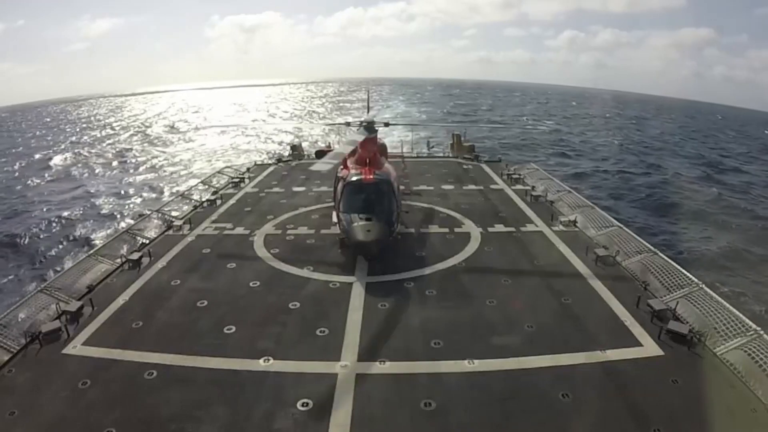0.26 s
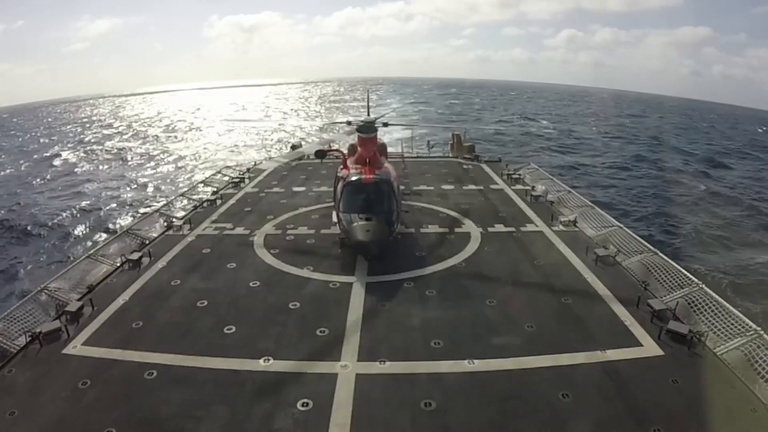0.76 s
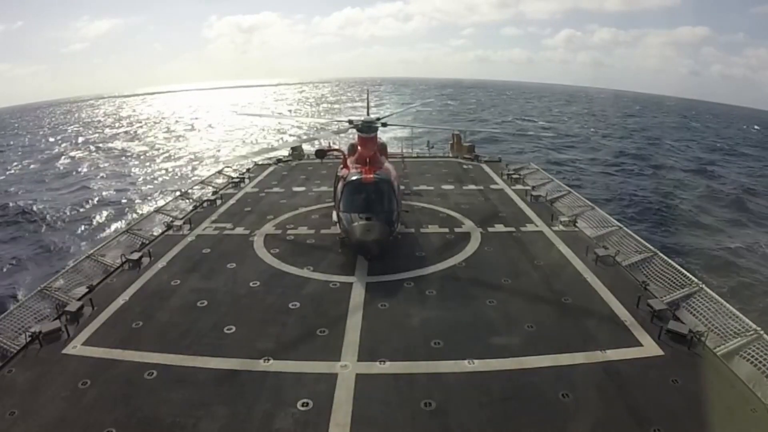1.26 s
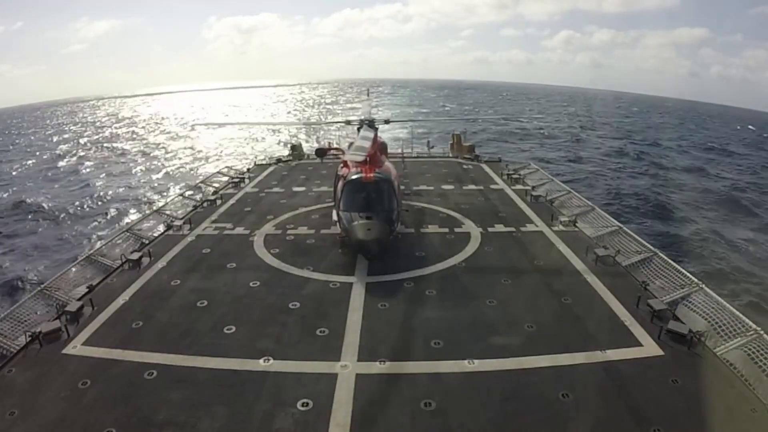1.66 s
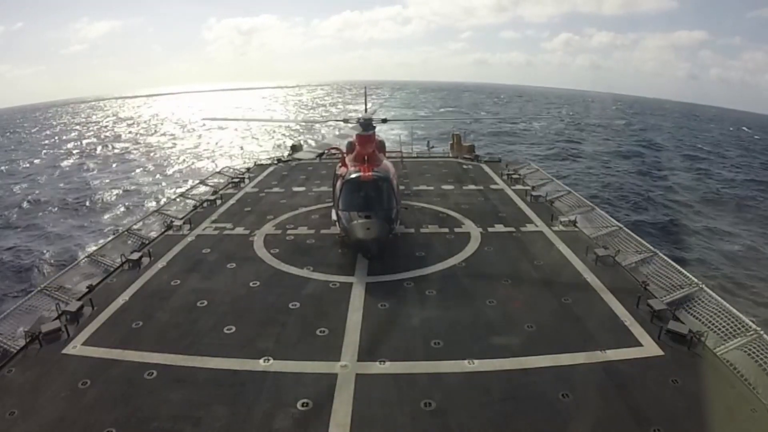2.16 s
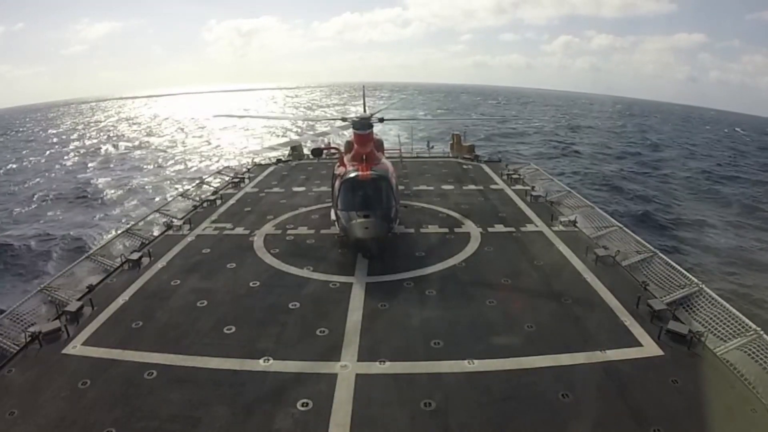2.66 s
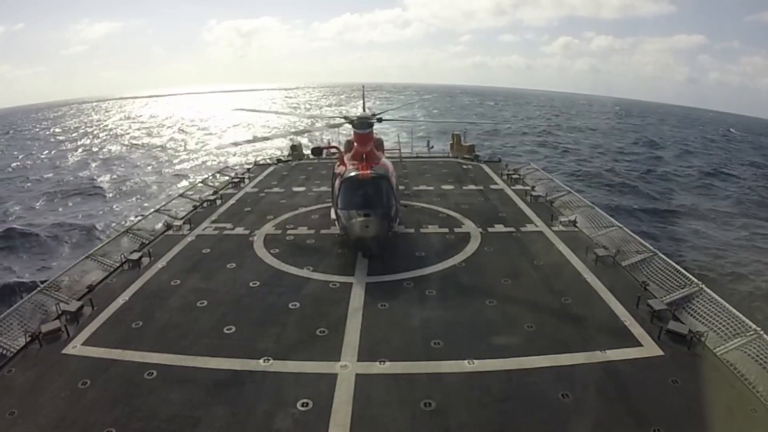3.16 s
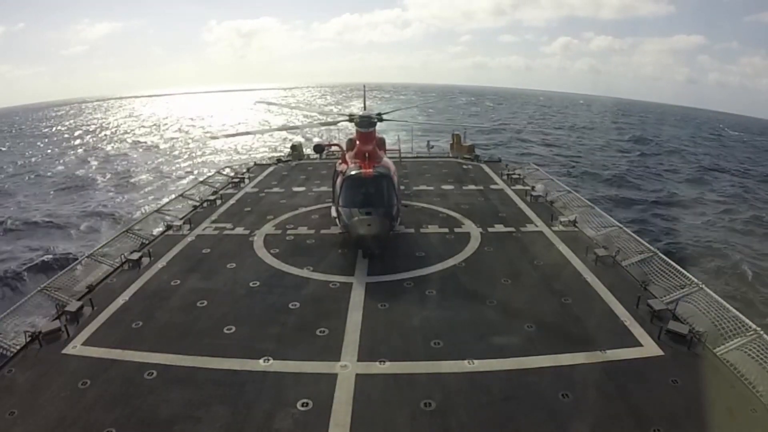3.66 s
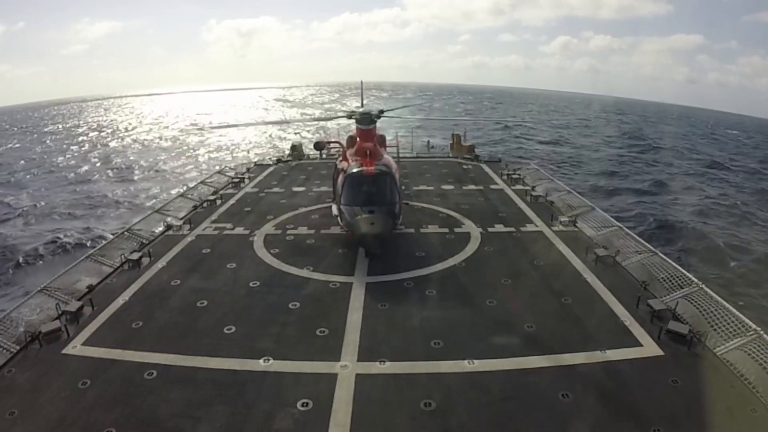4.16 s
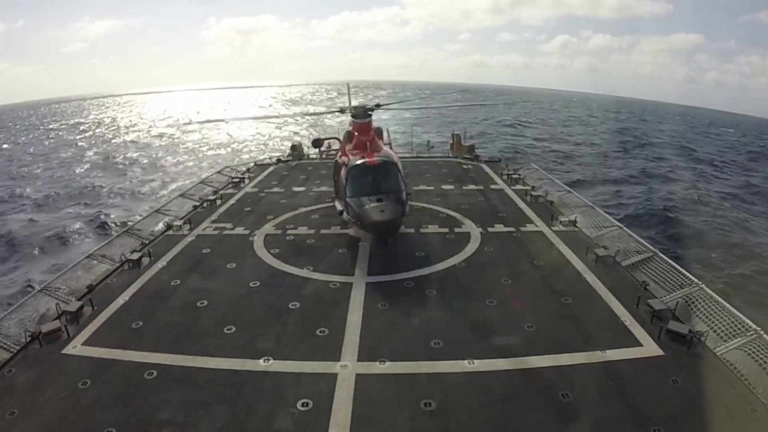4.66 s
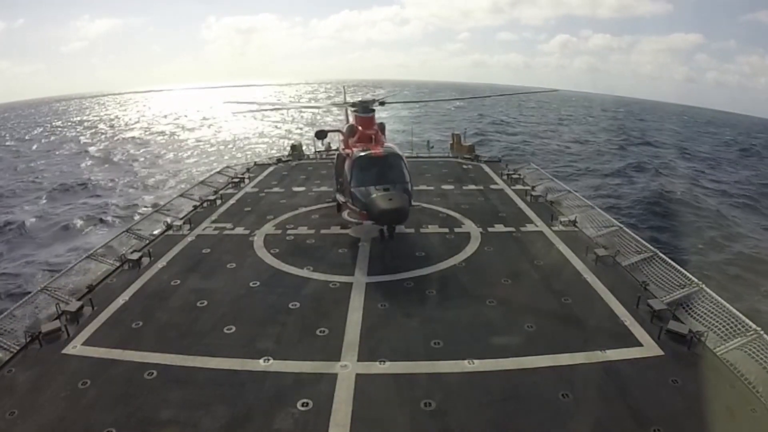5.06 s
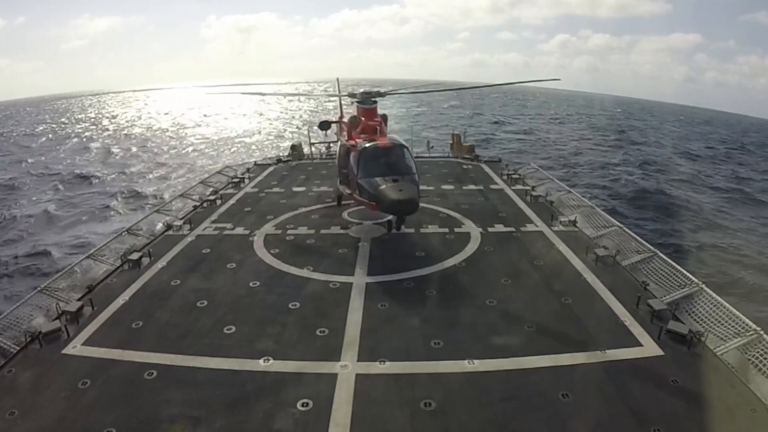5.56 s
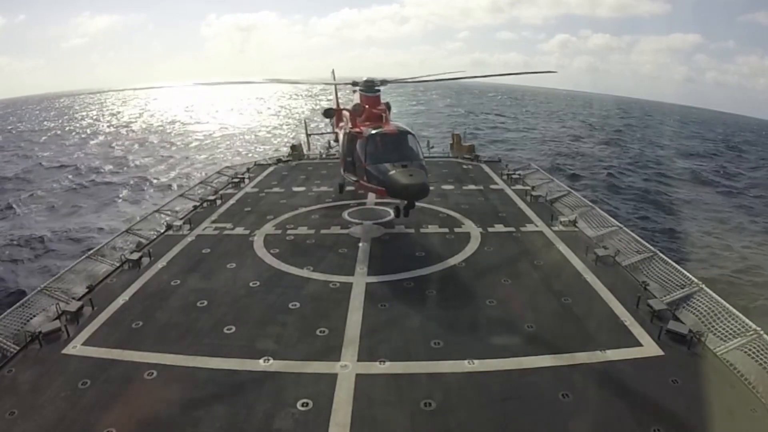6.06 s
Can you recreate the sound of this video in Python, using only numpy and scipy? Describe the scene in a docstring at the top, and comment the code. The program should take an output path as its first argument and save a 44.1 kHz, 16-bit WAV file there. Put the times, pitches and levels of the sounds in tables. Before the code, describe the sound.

Helicopter blades chop and boom on a ship's deck, growing louder through lift-off, with slaps, a thin rising whine and light spray.

```python
"""A helicopter runs on a ship's deck, heard from inside a closed housing. From the start its blades pass
about 24 times a second, giving low harmonics and a chopped wash over turbine hiss and the ship's rumble.
After a second the pilot pulls power: the rotor swells in gusts, blades slap, and the turbines wind up.
Wind rushes softly near 1.8 s; splats of spray follow, thickest near 4 s as downwash buffets the housing.
Around 4.7 s the wheels unload, and the thump and boom grow as the helicopter lifts off."""
import sys
import numpy as np
from scipy import signal
from scipy.fft import rfft, irfft, next_fast_len
from scipy.io import wavfile
from scipy.ndimage import map_coordinates

SR = 44100
rng = np.random.default_rng(int(sys.argv[2]) if len(sys.argv) > 2 else 0)


def master(y):
    """Save y as 16-bit WAV."""
    cut = np.clip(np.atleast_2d(y).T, -1, 1)
    pcm = np.round(cut * 32767)  # scale
    wavfile.write(sys.argv[1], SR, pcm.astype(np.int16))


N = 278271

# rotor speed: time_s, blade_pass_hz
BLADE_RATE = [(0, 24.25), (2, 24.27), (3.5, 24.23), (4.6, 24.17), (6.31, 24.2)]
# rotor thrust relative to the hover: time_s, thrust_db
THRUST = [(0, -11), (1.2, -9.5), (1.75, -3.5), (2.4, -4), (3.1, -2), (4.0, 0.5), (6.31, 1)]
# three groups of blade-pass harmonics: harmonic_number, relative_db
DRONE_ORDERS = [(2, -23), (3, -22.5), (4, -1), (5, -5.5)]
THROB_ORDERS = [(8, 0), (9, -7)]
BURR_ORDERS = [(10, 0), (11, 0.5), (12, -2.5), (13, -10), (14, -10.5)]
# gusts (+) and lulls (-): middle_s, length_s, boom_db, drone_and_hum_db, throb_db, air_and_burr_db
GUSTS = [(0.16, 0.33, 8.5, 4, 13.5, 1), (0.51, 0.68, 8, 5.5, 12.5, -2.5), (0.69, 0.19, -9, -6, -5, 1.5),
         (0.953, 0.64, 4.5, 4.5, 5, 0.5), (1.304, 0.12, 11.5, -0.5, -3.5, -0.5),
         (1.326, 0.53, 0.5, 6, 9, 2), (1.53, 0.52, 4.5, 0.5, -11.5, -2.0), (1.745, 0.1, -13, -2.5, 2, 0.5),
         (1.833, 0.75, 4.5, 2, 4, -1), (1.939, 0.12, -4.5, -9, 4.5, 2), (2.155, 0.33, 7.0, 0.5, -8, 0.5),
         (2.381, 0.15, 3, -8, 6.5, 4.5), (2.511, 0.093, -6, -1, 4.5, -0.5),
         (2.556, 0.58, 13.5, 1.0, 4, 3.5), (2.623, 0.082, 5.5, 5, 3.5, -3), (2.9, 0.21, 3, -5.5, 7.5, 1.5),
         (3.086, 0.097, -5, -1.5, -2, 0), (3.166, 0.13, 8.0, 3, -11, -1), (3.291, 0.19, 5, -4.5, 2.5, 1.5),
         (3.424, 0.19, 13.5, -1, 2, 3.5), (3.784, 0.23, 5, -2.5, -0.5, -5), (3.87, 0.17, -16, 0.5, 0, 1),
         (3.972, 0.16, 7.5, 1, 2, -0.5), (4.06, 0.2, -1, 5, -10, -2.0), (4.213, 0.57, 10.0, -2, 12.5, 8.5),
         (4.295, 0.38, 0.0, 6, -15, -8.5), (4.503, 0.18, 12.0, -2.5, 0, -2),
         (4.672, 0.19, -8.5, -2, 5.5, -1), (4.865, 0.21, -15, 4.0, -12.5, -1),
         (4.922, 0.6, 1.5, -7, -6, -2), (5.134, 0.1, -8.5, -7.5, 2, 1.5),
         (5.217, 0.23, 4.5, -5.5, -0.5, -1.5), (5.29, 0.09, -13, 1.0, -6.5, -1.5),
         (5.354, 0.12, 3.5, 2.5, 0.5, 0.5), (5.426, 0.15, -11, 0.5, 0.5, 0),
         (5.552, 0.17, -8, 0.5, -6.0, 1.0), (5.731, 0.6, 0.5, 0, 6.5, -0.5),
         (5.83, 0.13, -5.5, 4, 3.5, 0.5), (5.966, 0.16, 5, 5.5, 3, -0.5),
         (6.178, 0.25, -10.5, -1.5, 1.5, 1.5)]
# the air noise peaks later in each pass as the rotor loads and banks away: time_s, lag_passes
CHOP_LAG = [(0, 0.23), (1.7, .42), (3.2, .47), (5.3, 0.51), (5.7, 0.88)]
# the hardest cuts of a blade through a tip vortex: start_s, peak_db, t60_s, centre_hz
SLAPS = [(1.61, -37, 0.026, 456), (1.784, -35, 0.058, 460), (2.329, -33.5, 0.044, 490),
         (2.356, -34, 0.12, 330), (2.396, -33.5, 0.065, 450), (2.455, -33.5, .04, 454),
         (2.552, -48, .08, 824), (2.606, -38.5, 0.035, 520), (2.645, -38.5, 0.047, 530),
         (2.77, -38, .045, 460), (2.812, -30.5, 0.072, 426), (2.849, -37, 0.044, 515),
         (3.312, -26, 0.08, 328), (3.355, -36, 0.038, 510), (3.397, -24.5, .07, 445),
         (3.437, -35.5, .04, 499), (3.525, -37.5, 0.059, 505), (3.555, -35, 0.051, 485),
         (3.969, -34.5, 0.11, 550), (4.008, -36.5, 0.065, 640), (4.098, -23.5, 0.081, 288),
         (4.141, -27, 0.085, 350), (4.375, -39, 0.034, 570), (4.414, -23, 0.064, 288),
         (4.503, -38, 0.035, 497), (4.63, -30, 0.1, 425), (4.88, -39, 0.13, 690), (5.22, -33.5, 0.14, 467),
         (5.558, -34.5, .04, 557), (5.765, -30.5, 0.061, 510), (5.793, -42.5, 0.074, 830),
         (5.803, -27, 0.079, 467), (5.848, -31, 0.06, 540), (5.884, -35, .05, 452), (5.927, -33, 0.04, 456),
         (6.123, -39, 0.079, 650)]
# compressor whines: time_s, first_hz, second_hz, second_level_db, blur_hz
WHINES = [(0, 9080, 7720, -91, 60), (.35, 9190, 7820, -87, 35), (.6, 9250, 7840, -81, 25),
          (.9, 9370, 7930, -89, 45), (1.6, 9610, 8130, -92, 70), (1.9, 9880, 8300, -93, 60),
          (2.15, 9960, 8430, -83.5, 35), (2.7, 10160, 8590, -83.5, 40), (3.5, 10350, 8770, -89, 135),
          (4.6, 10620, 8960, -87.5, 125), (5.5, 10750, 9030, -86, 110), (6.31, 10850, 9050, -87.5, 110)]
# splats of spray on the housing, and a soft rush of wind near 1.8 s:
# start_s, peak_db, t60_s, centre_hz, half_width_octaves
SPRAY_AND_WIND = [(1.84, -65, .55, 1990, 0.54), (2.022, -61, 0.29, 2200, 0.63),
                  (2.06, -59, 0.3, 2490, 0.67), (3.799, -53, 0.15, 2460, .8),
                  (3.817, -46, 0.19, 2220, 0.76), (3.819, -53, .12, 4000, 0.23),
                  (3.821, -59, 0.11, 9800, .5), (3.895, -58.5, 0.14, 4200, 0.94),
                  (3.929, -56.5, 0.58, 2644, 0.97), (3.959, -56, .15, 6500, 0.36),
                  (4.002, -55.5, 0.12, 6560, 0.59), (4.005, -65, .08, 10900, 0.38),
                  (4.05, -53, 0.14, 1490, 0.3), (4.088, -50.5, .28, 1580, .5),
                  (4.086, -63, 0.33, 5400, 0.28), (4.122, -55.5, 0.45, 1930, 0.77),
                  (4.16, -64.5, .15, 5740, 0.43), (4.965, -56.5, 0.12, 2000, 0.35),
                  (5.351, -49.5, 0.033, 2290, 0.34), (6.122, -56.5, 0.23, 1900, 0.65),
                  (6.135, -62, .16, 4700, .45)]
# spectral densities of the noise sources: frequency_hz, relative_db
WASH_SPECTRUM = [(10, -49), (22, -14.5), (33, -12), (42, -20), (62, -15), (80, -9), (135, -6), (180, -0.5),
                 (215, 0), (250, -5), (290, -5), (330, -20), (450, -33), (1200, -120)]
SWISH_SPECTRUM = [(150, -41.5), (290, 1), (360, 1), (392, -5.5), (425, 0.5), (510, 1), (580, -7),
                  (660, -9.5), (770, -17.5), (1000, -18), (1130, -22.5), (1900, -30.5), (3500, -45),
                  (14000, -85)]
TIP_SPECTRUM = [(400, -24.5), (900, 3.5), (1350, 0.5), (2200, -7.5), (4000, -14.5), (8000, -33),
                (14000, -59.5)]
BUFFET_SPECTRUM = [(20, -8), (45, -9.5), (80, 1), (105, 7.5), (150, -16), (400, -63.5), (900, -120)]
EXHAUST_SPECTRUM = [(100, -28), (800, 9.5), (2100, 4), (2500, 1), (2900, -2), (3150, -1.5), (4200, -4),
                    (4800, -5.5), (5800, -7), (6600, -10), (9200, -13), (10700, -16), (12000, -22),
                    (15000, -31.5)]
HULL_SPECTRUM = [(15, -29.5), (27, -6), (33, 4.5), (42, -14.5), (60, -13.5), (150, -24), (800, -100)]
# wall resonances, relative to the plain wall: centre_hz, bandwidth_hz, gain_db
WALL_MODES = [(930, 55, 3), (1535, 60, 0), (1840, 90, -8), (2040, 60, -10), (2870, 120, -8),
              (3720, 130, -9), (4265, 130, -2), (5750, 250, -10), (7500, 400, -13)]

# how each layer follows the flight: hover_db, db_per_thrust_db, airborne_gain_db
THUMP_LAW, DRONE_LAW, HUM_LAW = (-45.5, -0.07, 5.7), (-34.5, 0.91, 2), (-33.6, 1.4, 2)
BOOM_LAW, THROB_LAW, BURR_LAW = (-29, 1.15, 2.8), (-29, 1.37, -1.8), (-35.5, 1.3, -4)
WASH_LAW, SWISH_LAW, TIP_LAW = (-30.5, 0.59, -0.3), (-38.5, 0.9, 0), (-62, 0.9, 3.5)
EXHAUST_LAW = (-60.5, 0.04, 0.3)
LIFT_OFF_MIDDLE_S, LIFT_OFF_LENGTH_S = 4.7, 0.7


def rotor(passes, boom_db, drone_db, throb_db, air_db):
    """Periodic pressure pulses form a harmonic series; the housing's air resonates at the seventh."""
    def gain(law, gust_db=0):
        eddy_db = wobble(17)  # small eddies sway each layer by about 1 dB
        return amp(level(law) + gust_db + eddy_db)

    thump = gain(THUMP_LAW) * harmonics(passes, [(0.99, 0)], 0.1, flutter_hz=8)
    drone = gain(DRONE_LAW, drone_db) * harmonics(passes, DRONE_ORDERS, 0.22, 13, drift_rad=0.22)
    hum = gain(HUM_LAW, drone_db) * harmonics(passes, [(6, 0)], 0.35, 12, drift_rad=0.58)
    boom = gain(BOOM_LAW, boom_db) * harmonics(passes, [(7, 0)], 0.16, 14, drift_rad=0.55)
    throb = gain(THROB_LAW, throb_db) * harmonics(passes, THROB_ORDERS, 0.29, 20, drift_rad=1.18)
    burr = gain(BURR_LAW, air_db) * harmonics(passes, BURR_ORDERS, 0.35, 20, drift_rad=1.3)
    return thump + drone + hum + boom + throb + burr


def harmonics(passes, orders, flutter_depth, flutter_hz, drift_rad=0):
    """Uneven inflow modulates each blade-pass harmonic at random in amplitude and phase."""
    total = np.zeros(N)
    for order, db in orders:
        flutter = 1 + flutter_depth * (wobble(flutter_hz) + 1j * wobble(flutter_hz))
        drift = np.exp(1j * drift_rad * wobble(11))
        carrier = np.exp(2j * np.pi * (order * passes + rng.random()))
        total += amp(db) * np.real(flutter * drift * carrier)
    return unit(total)


def level(law):
    """Amplitude follows a power law of thrust, a straight line in dB; lift-off adds an offset."""
    hover_db, db_per_thrust_db, airborne_gain_db = law
    thrust_db, = curves(THRUST)
    airborne = np.clip((np.arange(N) / SR - LIFT_OFF_MIDDLE_S) / LIFT_OFF_LENGTH_S + 0.5, 0, 1)
    return hover_db + db_per_thrust_db * thrust_db + airborne_gain_db * airborne


def gusts():
    """Gusts modulate the rotor's sound slowly: four dB curves, for boom, drone, throb and air."""
    return sum(np.outer(sizes_db, swell(middle_s, length_s)) for middle_s, length_s, *sizes_db in GUSTS)


def downwash(passes, gust_db):
    """Turbulence off the blades radiates broadband noise: a low wash, a swish and a thin tip hiss."""
    lag, = curves(CHOP_LAG)
    wash = amp(level(WASH_LAW) + gust_db) * noise(WASH_SPECTRUM)
    uneven_db = 0.64 * wobble(30)  # no two blades cut the same air
    swish = amp(level(SWISH_LAW) + 0.49 * gust_db + uneven_db) * noise(SWISH_SPECTRUM)
    tips = amp(level(TIP_LAW) + 0.3 * gust_db) * noise(TIP_SPECTRUM)
    wash *= chop(passes - lag, depth_db=1.6)
    swish *= chop(passes - lag, depth_db=1.5)
    tips *= chop(passes - lag, depth_db=1.4)
    return wash + housing(swish + tips)


def chop(passes, depth_db):
    """Amplitude modulation at the blade rate: one swell for each pass, with mean power 1."""
    return unit(amp(depth_db * np.cos(2 * np.pi * passes)))


def blade_slaps(rise_share=0.058, octaves=0.4):
    """Blade-vortex interaction: a blade cutting a tip vortex gives a short, hard puff of noise."""
    out, t = np.zeros(N + SR), np.arange(SR // 8) / SR
    for start_s, peak_db, t60_s, centre_hz in SLAPS:
        envelope = burst(t, rise_share * t60_s, t60_s)
        band = filtered(rng.standard_normal(len(t)), lambda hz: bell(hz, centre_hz, octaves) ** 2)
        puff = envelope * band
        puff *= np.linalg.norm(envelope) / np.linalg.norm(puff)  # the envelope sets the energy
        out[round(start_s * SR):][:len(t)] += amp(peak_db) * puff
    return housing(out[:N])


def buffet(middle_s=4.28, length_s=0.7):
    """Just before lift-off, the downwash's fluctuating pressure on the housing makes a lumpy rumble."""
    return amp(-31 + 2.3 * wobble(14)) * swell(middle_s, length_s) * noise(BUFFET_SPECTRUM)


def turbines(first_db=-85.7):
    """Exhaust noise and two rising compressor tones, which the wind modulates in pitch and level."""
    first_hz, second_hz, second_db, blur_hz = curves(WHINES)

    def whine(hz):
        fading = amp(wobble(7))
        blurred_hz = hz + blur_hz * wobble(400)
        return fading * np.sin(2 * np.pi * np.cumsum(blurred_hz) / SR)

    whines = amp(first_db) * whine(first_hz) + amp(second_db) * whine(second_hz)
    exhaust = amp(level(EXHAUST_LAW) + 0.39 * wobble(12)) * noise(EXHAUST_SPECTRUM)
    return housing(exhaust) + whines


def spray_and_wind(rise_share=0.026, grain_db=2.5, rolloff_hz=12500):
    """Transient excitation: a soft rush of wind, then splats of fine droplets, ring the wall's modes."""
    out, t = np.zeros(N + SR), np.arange(SR // 3) / SR
    for start_s, peak_db, t60_s, centre_hz, octaves in SPRAY_AND_WIND:
        grain = amp(grain_db * np.repeat(rng.standard_normal(len(t)), repeats=32)[:len(t)])
        colour = lambda hz: bell(hz, centre_hz, octaves) / (1 + (hz / rolloff_hz) ** 4)
        rasp = unit(filtered(grain * rng.standard_normal(len(t)), colour))
        envelope = burst(t, rise_share * t60_s, t60_s)
        out[round(start_s * SR):][:len(t)] += amp(peak_db) * envelope * rasp
    return housing(out[:N], ring_db=4)


def hull_rumble():
    """The ship's rumble is stationary low-frequency noise."""
    return amp(-54) * noise(HULL_SPECTRUM)


def housing(x, ring_db=0):
    """Resonant transmission: walls pass more sound at their modes, which gain ring_db when struck."""
    def response(hz):
        return 1 + sum(amp(db + ring_db) * 1j * hz * width / (centre ** 2 - hz ** 2 + 1j * hz * width)
                       for centre, width, db in WALL_MODES)

    return filtered(x, response)


def burst(t, rise_s, t60_s):
    """A linear rise, then exponential decay by 60 dB in t60_s."""
    return np.minimum(t / rise_s, 1) * amp(-60 * np.maximum(t - rise_s, 0) / t60_s)


def swell(middle_s, length_s):
    """A raised-cosine pulse from 0 to 1 and back."""
    return np.cos(np.pi * np.clip((np.arange(N) / SR - middle_s) / length_s, -0.5, 0.5)) ** 2


def bell(hz, centre_hz, octaves):
    """A band-pass hump on a log-frequency axis."""
    return 1 / (1 + (np.log2((hz + 1) / centre_hz) / octaves) ** 2)


def noise(spectrum):
    """White noise shaped to a spectrum, at rms 1."""
    points_hz, points_db = np.transpose(spectrum)
    colour = lambda hz: amp(np.interp(np.log(hz + 1), np.log(points_hz), points_db))
    return unit(filtered(rng.standard_normal(N), colour))


def filtered(x, response):
    """Linear filtering multiplies the spectrum by a frequency response."""
    size = next_fast_len(len(x) + 8192)
    return irfft(rfft(x, size) * response(np.fft.rfftfreq(size, 1 / SR)), size)[:len(x)]


def wobble(rate_hz):
    """A smooth random curve through rate_hz knots a second."""
    knots = rng.standard_normal(int(N * rate_hz / SR) + 4)
    return map_coordinates(knots, [np.arange(N) * rate_hz / SR])


def curves(rows):
    """Linear interpolation of each column after the time, one value per sample."""
    times_s, *columns = np.transpose(rows)
    return [np.interp(np.arange(N) / SR, times_s, column) for column in columns]


def amp(db):
    """Decibels to amplitude ratio."""
    return 10 ** (np.asarray(db) / 20)


def unit(x):
    """Normalisation to rms 1."""
    return x / np.sqrt(np.mean(x ** 2) + 1e-20)


def scene():
    """Superposition: the pressures of rotor, air, engines, spray and ship add at one point."""
    blade_hz, = curves(BLADE_RATE)
    passes = np.cumsum(blade_hz) / SR
    boom_db, drone_db, throb_db, air_db = gusts()
    tones = rotor(passes, boom_db, drone_db, throb_db, air_db)
    air = downwash(passes, air_db) + buffet() + blade_slaps()
    return (tones + air + turbines() + spray_and_wind() + hull_rumble())[None]


def record(dry, cutoff_hz=14900, fade_s=0.004):
    """Band limiting: a steep low-pass removes the top treble, and a short taper eases both ends."""
    lowpass = signal.ellip(10, 0.1, 90, cutoff_hz, fs=SR, output="sos")
    return signal.sosfilt(lowpass, dry) * signal.windows.tukey(N, 2 * fade_s * SR / N)


dry = scene()
out = record(dry)
master(out)
```